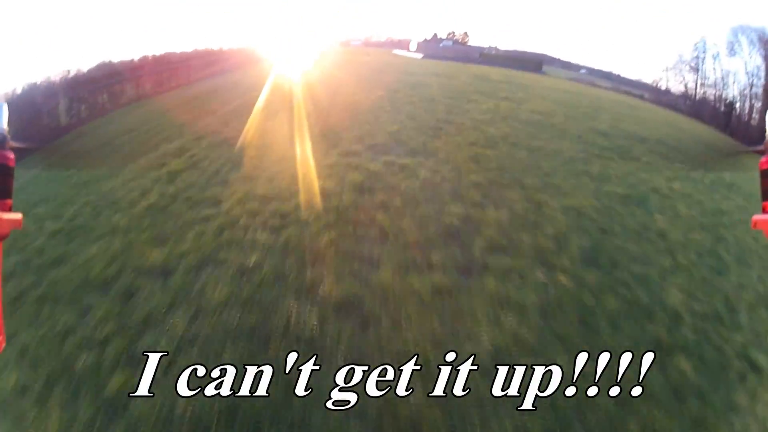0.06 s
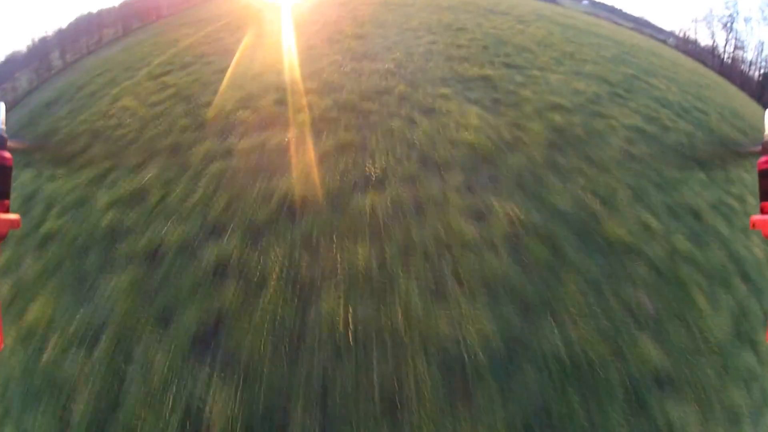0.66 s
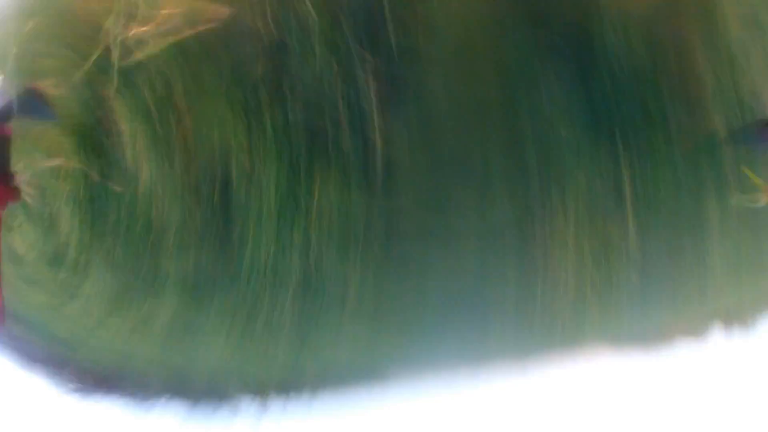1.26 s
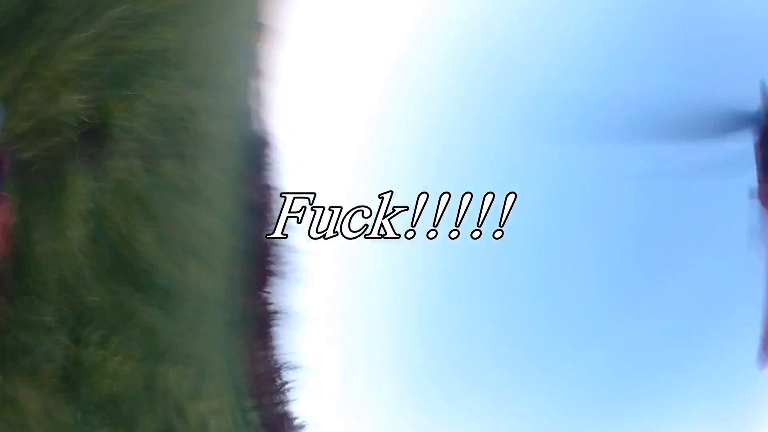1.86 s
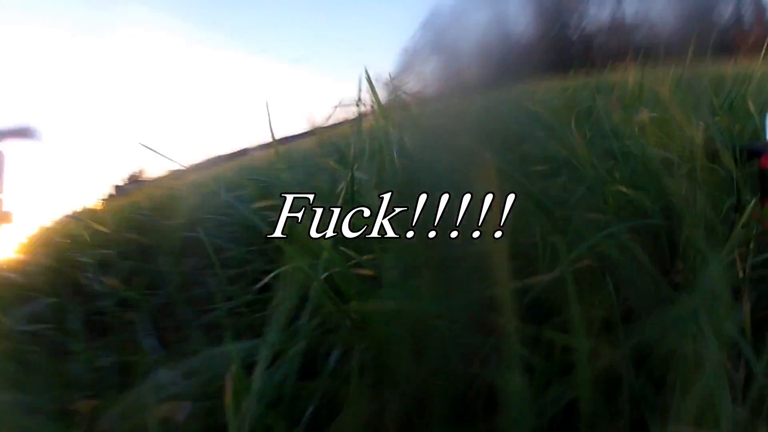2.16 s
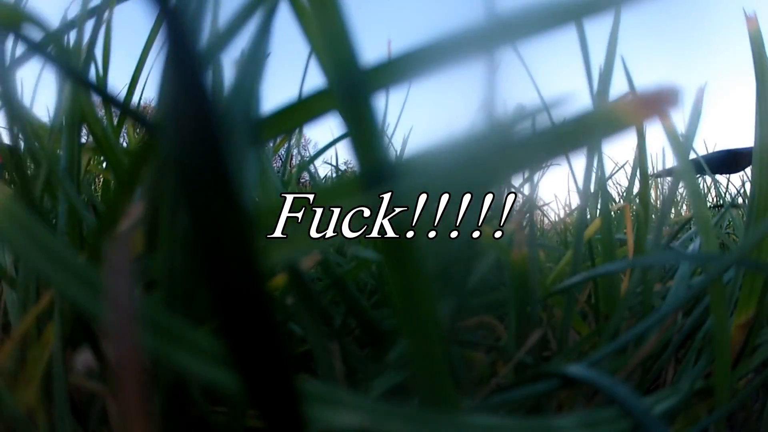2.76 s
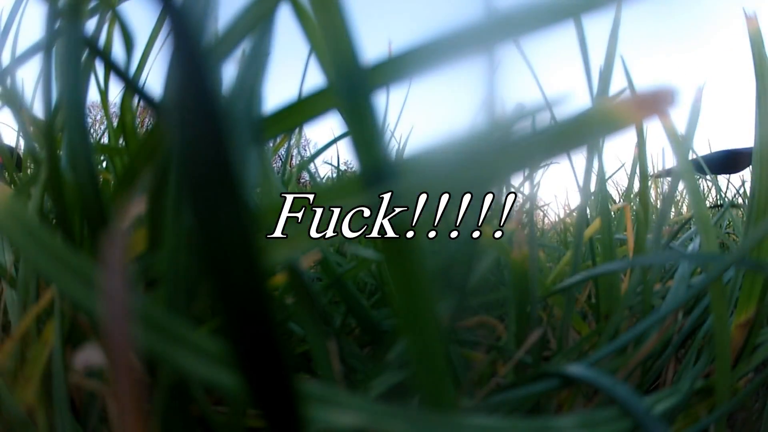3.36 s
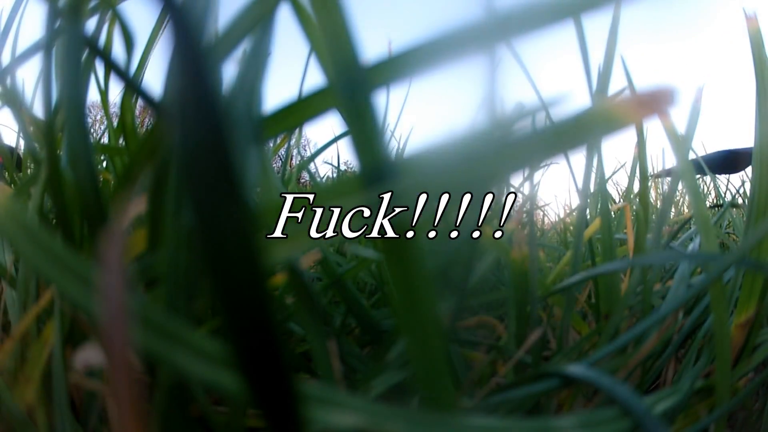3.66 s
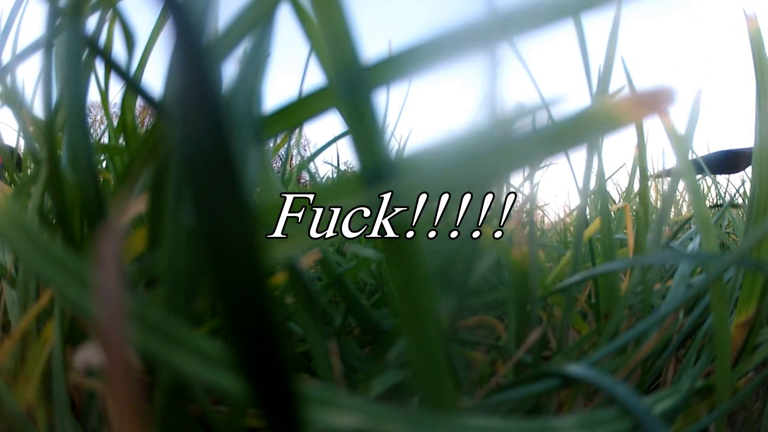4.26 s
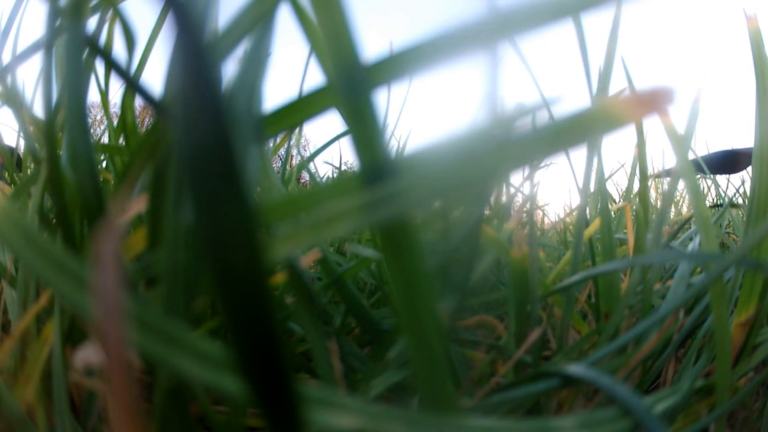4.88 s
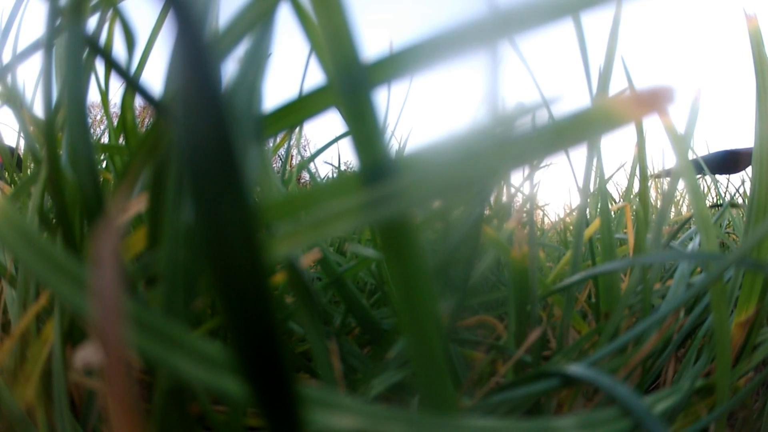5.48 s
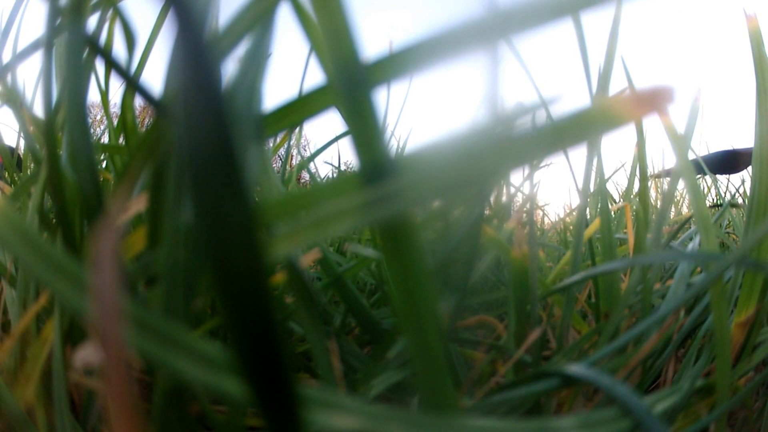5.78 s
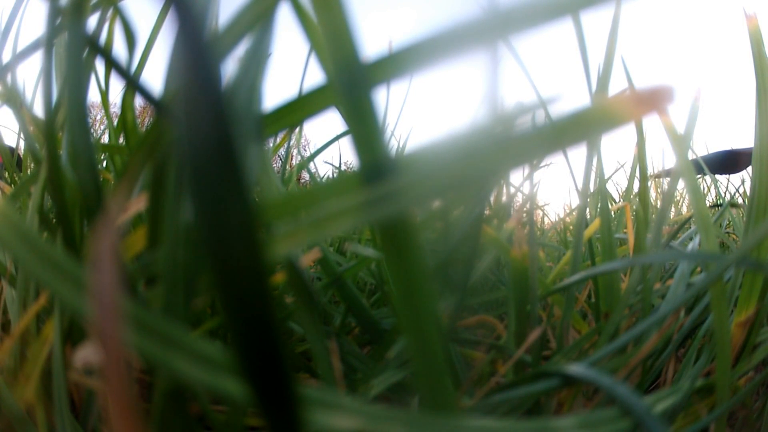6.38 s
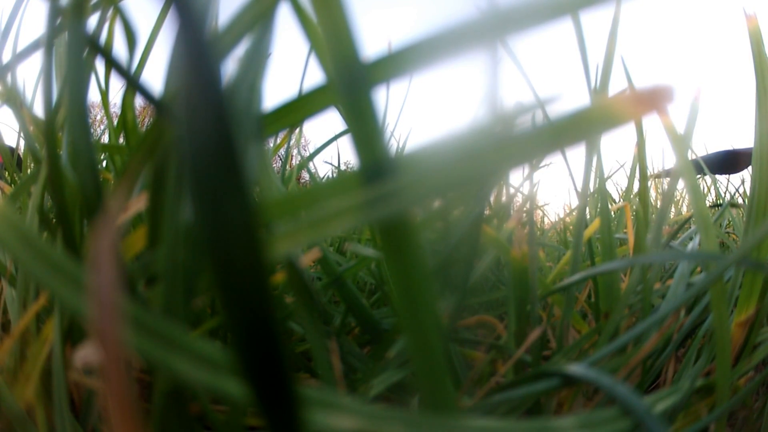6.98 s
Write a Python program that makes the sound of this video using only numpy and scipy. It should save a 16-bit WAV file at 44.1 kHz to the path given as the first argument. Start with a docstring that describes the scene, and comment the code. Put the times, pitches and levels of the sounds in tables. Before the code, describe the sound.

From the start, a small drone is heard very close, from on board, flying low over grass. Its propellers hum and buzz with an uneven pulse over air hiss and low rumble, with short high motor whines and a few scuffs of grass. At about 1.2 seconds it clips the ground with sharp cracks, and one motor races up in pitch. A hard hit near 1.6 seconds starts a tumble: rapid, harsh cracks and tearing as a slowed propeller slashes stems, with a low shudder. At about 2.2 seconds the propellers stop. Soft thumps, rustles and snaps die away by 2.7 seconds, followed by a few tiny ticks until about 3.4 seconds. Only very faint, low wind with soft gusts remains until the end at about 7 seconds. The cheap microphone overloads on peaks and gives the treble a gritty edge.

```python
"""A small quadcopter skims a meadow, heard from its own frame: four propellers hum and beat, air rushes by,
motors whine with each correction. It clips the ground, one motor races, and it cartwheels,
a slowed propeller slashing the grass. It drops in and stops; stems settle with a few ticks,
and light wind is left. Throughout, the cheap recorder overloads on peaks and mirrors its treble."""
import sys
import numpy as np
from scipy import signal
from scipy.fft import rfft, irfft
from scipy.io import wavfile

SR = 44100
rng = np.random.default_rng(int(sys.argv[2]) if len(sys.argv) > 2 else 0)


def store_wav(level_fs):
    """Save 16-bit WAV to argv[1]."""
    pcm = np.round(np.clip(np.atleast_2d(level_fs), -1, 1) * 32767)
    wavfile.write(sys.argv[1], SR, pcm.T.astype(np.int16))


N = 318843
TIME_S, BINS_HZ = np.arange(N) / SR, np.fft.rfftfreq(N, 1 / SR)


def amp(db):
    """Decibels to gain."""
    return 10 ** (np.asarray(db) / 20)


def unit(x):
    """Scale to rms 1."""
    return x / np.sqrt(np.mean(x ** 2) + 1e-20)


def curve(rows, column=1):
    """Table column, interpolated per sample."""
    rows = np.array(rows)
    return np.interp(TIME_S, rows[:, 0], rows[:, column])


def envelope(rows, column=1, fade_s=0.03):
    """Gain from a dB column, fading to silence outside the table."""
    start, end = rows[0][0], rows[-1][0]
    gate = np.interp(TIME_S, [start - fade_s, start, end, end + fade_s], [0, 1, 1, 0])
    return amp(curve(rows, column)) * gate


def phase(hz):
    """Running phase [rad] of a varying frequency."""
    return 2 * np.pi * np.cumsum(hz) / SR


def colour(x, spectrum):
    """Minimum-phase filter: clicks keep their sharp fronts."""
    hz, db = np.transpose(spectrum)
    grid_hz = abs(np.fft.fftfreq(2048, 1 / SR))
    log_gain = np.log(amp(np.interp(np.log(grid_hz + 1), np.log(hz), np.maximum(db, -80))))
    taps = np.fft.ifft(np.exp(np.conj(signal.hilbert(log_gain)))).real
    return signal.fftconvolve(x, taps)[:len(x)]


def noise(spectrum):
    """Steady shaped noise, rms 1."""
    hz, db = np.transpose(spectrum)
    gain = amp(np.interp(np.log(BINS_HZ + 1), np.log(hz), db))
    return unit(irfft(rfft(rng.standard_normal(N)) * gain, N))


def drift(corner_hz):
    """Slow random wander, rms 1."""
    return unit(irfft(rfft(rng.standard_normal(N)) / (1 + (BINS_HZ / corner_hz) ** 4), N))


def add(mix, start_s, sound):
    """Mix a sound in at a time."""
    part = mix[round(start_s * SR):][:len(sound)]
    part += sound[:len(part)]


# propeller hums cancel: (time [s])
BEAT_NULLS = [-.02, .115, .21, .348, .412, .49, .63, .735, .825, .89, 1.02, 1.18]


def beating(null_db=-13):
    """The propellers slip one blade between nulls; the hum swells and sinks."""
    slip = np.interp(TIME_S, BEAT_NULLS, np.arange(len(BEAT_NULLS)))
    return np.hypot(np.sin(np.pi * slip), amp(null_db))


# leading propeller: (time [s], blade rate [Hz])
BLADE_RATE = [(0, 218), (.08, 206), (.16, 204), (.28, 194), (.4, 205), (.52, 209), (.62, 199), (.73, 204),
              (.93, 202), (1.02, 204), (1.14, 198)]
# throttle: (time [s], hum [dB], buzz [dB])
THROTTLE = [(0, -24.5, -31), (.18, -20.5, -34.5), (.36, -25, -29.5), (.46, -18.5, -31), (.58, -20.5, -34),
            (.67, -24, -25), (.79, -18.5, -28), (.86, -23.5, -28.5), (.95, -17, -30), (1.0, -31, -29),
            (1.07, -13, -27.5), (1.19, -28.5, -36.5)]
# propellers: (speed [x leading], hum [dB], buzz [dB])
PROPELLERS = [(1, 0, -3), (1.03, -13, -12), (.965, -13.5, -7.5), (.905, -10.5, -17.5)]
# buzz overtones: (order [x blade rate], level [dB])
OVERTONES = [(2, 0.5), (3, -1), (4, -5), (5, -9), (6, -10.5), (7, -17), (8, -23), (9, -13), (10, -13.5),
             (11, -19), (13, -14)]


def propellers(wander=0.0059, flutter_db=2, shaft_db=-21, full_load_db=-25, brighten=0.3):
    """Four separately trimmed propellers hum and beat; throttle brightens their buzz."""
    hum = envelope(THROTTLE) * beating()
    buzz = envelope(THROTTLE, column=2)
    tilt_db_per_octave = brighten * (curve(THROTTLE, column=2) - full_load_db)
    out = np.zeros(N)
    for index, (speed, hum_db, buzz_db) in enumerate(PROPELLERS):
        trim = 1 + wander * np.sqrt(index + 0.19) * drift(15)
        angle = phase(curve(BLADE_RATE) * speed * trim)
        imbalance = amp(shaft_db) * np.cos(angle / 2)  # once a turn
        out += hum * amp(hum_db) * (np.cos(angle) + imbalance)
        for order, db in OVERTONES:
            overtone_db = buzz_db + db + tilt_db_per_octave * np.log2(order / 2) + flutter_db * drift(27)
            out += buzz * amp(overtone_db) * np.cos(order * angle)
    return out


# dips into grass: (start [s], length [s], level [dB])
BRUSHES = [(-.02, 0.28, -23.5), (0.373, .035, -29.5), (0.549, 0.018, -32.5), (0.642, 0.038, -30.5),
           (0.713, 0.047, -27), (0.849, 0.087, -34), (0.994, 0.062, -32.5), (1.472, 0.058, -25),
           (1.623, .075, -26), (1.736, 0.24, -33), (1.987, .06, -26), (2.073, .105, -34),
           (2.259, 0.19, -43.5), (2.489, .035, -49), (2.61, .05, -60)]


def brushing(attack_s=0.023, release_s=0.036):
    """Blade depth in the grass: each dip rises, holds and dies away."""
    depth = np.zeros(N)
    for start_s, length_s, db in BRUSHES:
        rise = np.clip((TIME_S - start_s) / attack_s, 0, 1)
        fall = np.exp(-np.maximum(TIME_S - start_s - length_s, 0) / release_s)
        depth += amp(db) * rise * fall
    return depth


# propeller air hiss; the recorder ducks it after the hard hit, it stops on landing: (time [s], level [dB])
AIR_HISS = [(0, -29.5), (1.2, -33.5), (1.45, -27.5), (1.56, -41.5), (1.59, -42.5), (1.66, -34.5),
            (2.17, -38), (2.24, -76)]
# air hiss: (frequency [Hz], density [dB])
AIR_SPECTRUM = [(100, -18.5), (300, 1.5), (700, -1), (1000, -2.5), (1500, -3.5), (2100, -7), (2800, -2.5),
                (3500, -9), (4400, -0.5), (5200, -5.5), (6000, -4), (8000, -51)]
# tearing grass: (frequency [Hz], density [dB])
GRASS_SPECTRUM = [(60, -22), (200, 4.5), (400, -3), (800, -1), (1400, 1), (2000, -1.5), (2700, -0.5),
                  (3500, -3), (4500, -5), (6000, -1), (8000, -53)]


def air_and_grass(chop=0.26, grass_db=1.5, spread_db=2, flicker_db=1,
                  min_cuts_per_s=700, deep_cuts_per_s=5800, deep_db=-24, doubling_db=8.5):
    """Air hiss chopped at the blade rate, and tiny grass cuts that thin to a crackle at a light touch."""
    chopping = 1 + chop * np.cos(phase(curve(BLADE_RATE)))
    depth = brushing()
    depth_db = 20 * np.log10(depth + 1e-9)
    cuts_per_s = min_cuts_per_s + deep_cuts_per_s * 2 ** ((depth_db - deep_db) / doubling_db)
    sizes = rng.choice([-1, 1], N) * amp(spread_db * np.minimum(rng.exponential(1, N), 5))
    cuts = (rng.random(N) < cuts_per_s / SR) * sizes / np.sqrt(cuts_per_s)
    air = envelope(AIR_HISS) * chopping * noise(AIR_SPECTRUM)
    grass = amp(grass_db) * depth * unit(colour(cuts, GRASS_SPECTRUM))
    return amp(flicker_db * drift(54)) * (air + grass)


# frame shake: (time [s], level [dB])
BUFFET = [(0, -43), (.32, -47), (.43, -36.5), (.75, -33.5), (1.0, -40), (1.25, -41.5), (1.46, -29),
          (1.7, -34.5), (1.88, -45), (2.02, -31.5), (2.24, -48), (2.35, -36.5), (2.5, -58), (2.7, -78)]
# frame rumble: (frequency [Hz], density [dB])
BUFFET_SPECTRUM = [(20, -10.5), (60, 2), (130, 4.5), (250, -0.5), (450, -10.5), (800, -18), (1500, -29.5),
                   (4000, -56)]


def buffet(gain_db=1):
    """Turbulence and rough ground shake the frame into a low rumble."""
    return amp(gain_db) * envelope(BUFFET) * noise(BUFFET_SPECTRUM)


# attitude corrections: (time [s], whine [Hz], level [dB])
CORRECTIONS = [(0.194, 4020, -28), (.32, 3950, -33), (0.567, 3970, -32), (0.724, 4280, -26.5),
               (0.774, 3820, -36), (0.863, 4314, -31), (.92, 3850, -31.5), (1.015, 4270, -32),
               (1.057, 3885, -30.5), (1.125, 4252, -39)]


def motor_whine(half_length_s=0.03, rise_hz_per_s=2000, arch_hz=90, warble=0.005):
    """At each correction a motor sings at its switching rate, in a rising arch."""
    out = np.zeros(N)
    waver = 1 + warble * drift(60)
    for crest_s, hz, db in CORRECTIONS:
        offset = (TIME_S - crest_s) / half_length_s
        effort = np.exp(-np.minimum(offset ** 2, 50))
        glide_hz = rise_hz_per_s * half_length_s * np.tanh(offset) + arch_hz * (effort - 1)
        out += amp(db) * effort * np.cos(phase((hz + glide_hz) * waver))
    return out


# turf scrapes, stem rustles: (time [s], length [s], level [dB])
SCRAPES = [(0.371, 0.0054, -16), (.493, 0.012, -17.5), (1.144, 0.039, -24.5), (1.166, 0.01, -10.5),
           (1.183, 0.0087, -9.5), (1.236, 0.0048, -11), (1.567, 0.0055, -17), (2.124, 0.0065, -13),
           (2.307, 0.0079, -28.5), (2.357, 0.03, -26.5), (2.485, 0.039, -39.5), (2.6, 0.0091, -48),
           (2.835, 0.016, -50.5)]


def scrapes(rise_s=0.0023):
    """The craft bites into turf and stems: short bursts of tearing noise."""
    out, tearing = np.zeros(N), noise(GRASS_SPECTRUM)
    t = np.arange(SR // 5) / SR
    for start_s, length_s, db in SCRAPES:
        window = (1 - np.exp(-t / rise_s)) * np.exp(-(t / length_s) ** 2)
        add(out, start_s, amp(db) * window * tearing[round(start_s * SR):][:len(t)])
    return out


# frame knocks, plastic and stem clicks: (time [s], level [dB], ring [Hz], t60 [s])
KNOCKS = [(0.376, -13.5, 130, 0.039), (.378, 1.5, 2010, 0.0058), (0.5, -3, 2280, .014),
          (1.166, -15.5, 280, .03), (1.573, 7.5, 530, 0.011), (1.612, -8.5, 610, 0.0092),
          (2.203, -3.5, 4470, 0.0096), (2.253, -22, 4480, 0.011), (2.281, -9, 4280, 0.0083),
          (2.309, -23, 148, 0.072), (2.32, -19, 3000, .007), (2.354, -19.5, 108, 0.067),
          (2.37, -19, 430, 0.014), (2.436, -25, 83.5, 0.059), (2.516, -20, 2570, 0.0081),
          (2.603, -40, 1540, 0.026), (3.175, -44.5, 3290, 0.014), (3.408, -46, 2090, 0.0064)]
# dry crack: (frequency [Hz], density [dB])
CRACK_SPECTRUM = [(180, -28), (300, 1), (508, -4.5), (808, -5.5), (1380, -2.5), (1850, -8), (2460, -2.5),
                  (3210, -7), (4500, -8.5), (5160, -6.5), (6000, -14), (7800, -58), (13200, -120)]


def knocks(grit=0.12, crossover_hz=1500):
    """Knocked frame and stems ring briefly; the high ones are dry snaps."""
    out = np.zeros(N)
    t = np.arange(SR // 5) / SR
    for start_s, db, hz, t60_s in KNOCKS:
        dryness = hz / (hz + crossover_hz)
        ring = (1 - dryness) * np.sin(2 * np.pi * hz * t)
        snap = grit * dryness * unit(colour(rng.standard_normal(len(t)), CRACK_SPECTRUM))
        add(out, start_s, amp(db) * (ring + snap) * np.exp(-np.log(1000) * t / t60_s))
    return out


def blade_strike(decay_s=0.00085, ring_hz=1480, ring_db=-12, ring_t60_s=0.0096):
    """A blade cracks through a stem and its plastic rings."""
    t = np.arange(SR // 60) / SR
    window = np.sqrt(t / decay_s) * np.exp(-t / decay_s)
    burst = colour(rng.standard_normal(len(t)) * window, CRACK_SPECTRUM)
    ring = np.sin(2 * np.pi * ring_hz * t) * np.exp(-np.log(1000) * t / ring_t60_s)
    return burst / abs(burst).max() + amp(ring_db) * ring


# hard strikes on stems and soil: (time [s], level [dB])
STRIKES = [(1.156, -17), (1.166, -4), (1.186, -11), (1.191, -19), (1.573, -5.5), (1.628, -15),
           (1.663, -5.5), (1.678, -5), (1.693, -9), (1.714, -12.5), (1.722, -11), (1.744, -8),
           (1.751, -9.5), (1.766, -13), (1.795, -7.5), (1.824, -7.5), (1.849, -10.5), (1.885, -12.5),
           (1.905, -16.5), (1.915, -8.5), (1.927, -10), (1.979, -13.5), (1.999, -6), (2.044, -6.5),
           (2.075, -13.5), (2.082, -10.5), (2.127, -5), (2.138, -12), (2.155, -19), (2.184, -17.5),
           (2.204, -29)]
# slowed propeller in grass: (time [s], blade rate [Hz], level [dB])
SLASH = [(1.63, 126, -23.5), (1.67, 131, -16.5), (1.82, 138, -16.5), (1.88, 134, -26.5), (2.02, 126, -21),
         (2.12, 115, -17), (2.2, 105, -29)]


def slashing(strike_gain_db=3, scatter_db=3.5, lag_s=0.0005):
    """Hard blade strikes; the slowed propeller fills the gaps with a lighter cut per pass."""
    out, gain, rate_hz = np.zeros(N), envelope(SLASH, column=2), curve(SLASH)
    for start_s, db in STRIKES:
        add(out, start_s + lag_s, amp(db + strike_gain_db) * blade_strike())
    for (start_s, _), (end_s, _) in zip(STRIKES, STRIKES[1:]):
        passes = max(round((end_s - start_s) * rate_hz[round(start_s * SR)]), 1)
        for pass_s in np.linspace(start_s, end_s, passes + 1)[1:-1]:
            size = gain[round(pass_s * SR)] * amp(scatter_db * rng.standard_normal())
            add(out, pass_s + lag_s, size * blade_strike())
    return out


def lone_rotor(track, orders, wander=0.0039):
    """One propeller, out of step with the rest, sounds at multiples of its rate."""
    angle = phase(curve(track) * (1 + wander * drift(25)))
    tone = sum(amp(db) * np.cos(order * angle + 2 * np.pi * rng.random()) for order, db in orders)
    return envelope(track, column=2) * tone


# racing motor: (time [s], blade rate [Hz], level [dB])
SURGE = [(1.22, 160, -40.5), (1.32, 173, -35.5), (1.45, 196, -31), (1.52, 215, -35), (1.56, 255, -34)]
# its harmonics: (order [x blade rate], level [dB])
SURGE_ORDERS = [(1, 2.5), (2, -3), (3, 2), (4, -11.5), (5, -18.5), (24, -13)]


def surge():
    """One motor races up as the craft flips."""
    return lone_rotor(SURGE, SURGE_ORDERS)


# dragging propeller: (time [s], shaft rate [Hz], level [dB])
SHUDDER = [(1.58, 63, -34.5), (1.67, 66.5, -30.5), (1.75, 61, -37.5), (1.83, 73, -36), (1.9, 67, -42.5),
           (2.03, 60, -39.5), (2.18, 49, -50.5)]
# its harmonics: (order [x shaft rate], level [dB])
SHUDDER_ORDERS = [(1, -2.5), (2, -7.5), (3, -4.5), (4, -2.5), (5, 0), (6, -9.5), (8, -10)]


def shudder():
    """A dragging propeller shakes the frame."""
    return lone_rotor(SHUDDER, SHUDDER_ORDERS)


# far background: (frequency [Hz], density [dB])
FIELD_SPECTRUM = [(12, -41.5), (20, -14.5), (59, -1), (104, -4), (166, -2.5), (195, -4.5), (328, -8.5),
                  (563, -16.5), (944, -16.5), (1480, -26), (3280, -30.5), (5500, -27.5), (7150, -68),
                  (12100, -120)]
# gusts: (crest [s], length [s], level [dB], centre [Hz])
GUSTS = [(2.75, 0.37, -69.5, 109.6), (3.549, 0.53, -63.5, 220), (4.08, 0.33, -62, 79.6),
         (4.247, 0.39, -62, 148.6), (5.257, 0.35, -60.5, 213.6), (5.849, 0.33, -65, 239.7),
         (6.146, 0.4, -57.5, 220)]


def wind(floor_db=-62.5, skirt_db=-20):
    """A steady far wash; soft gusts swell and fade over the resting craft."""
    out = amp(floor_db) * noise(FIELD_SPECTRUM)
    for crest_s, length_s, db, hz in GUSTS:
        band = noise([(hz / 8, skirt_db), (hz, 0), (hz * 1.43, -3), (hz * 2.3, skirt_db), (hz * 10, -70)])
        swell = np.exp(-(2 * (TIME_S - crest_s) / length_s) ** 2)
        out += amp(db) * swell * band
    return out


def scene():
    """All sources at the one microphone on the frame."""
    rotors = propellers() + motor_whine() + surge() + shudder()
    return (rotors + air_and_grass() + buffet() + slashing() + scrapes() + knocks() + wind())[None]


def filtered(x, hz, gain):
    """Linear-phase filter from gains on a frequency grid."""
    taps = signal.firwin2(401, hz, gain, window=("kaiser", 9), fs=SR)
    return signal.oaconvolve(x, taps[None], "same")


def record(dry, ceiling=0.31, corner_hz=5050, order=14, hold_hz=12000, edge_hz=15450):
    """Soft overload, low-pass, a slow sample-and-hold that mirrors sound into the treble, band limit."""
    clipped = dry / (1 + (dry / ceiling) ** 4) ** (1 / 4)
    hz = np.linspace(0, SR / 2, 513)
    narrow = filtered(clipped, hz, 1 / np.sqrt(1 + (hz / corner_hz) ** (2 * order)))
    mirrored = narrow * (1 + 2 * np.cos(2 * np.pi * hold_hz * TIME_S))
    held = filtered(mirrored, hz, np.sinc(hz / hold_hz))
    band_limit = signal.firwin(511, edge_hz, window=("kaiser", 9), fs=SR)
    return signal.oaconvolve(held, band_limit[None], "same")


dry = scene()
out = record(dry)
store_wav(out)
```